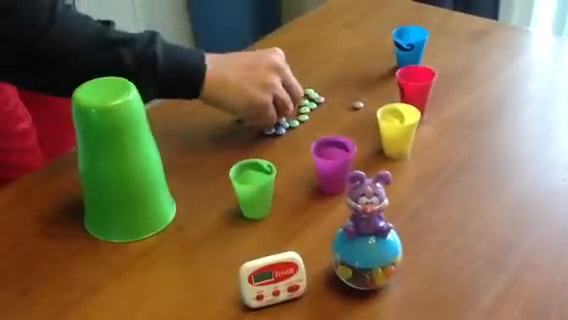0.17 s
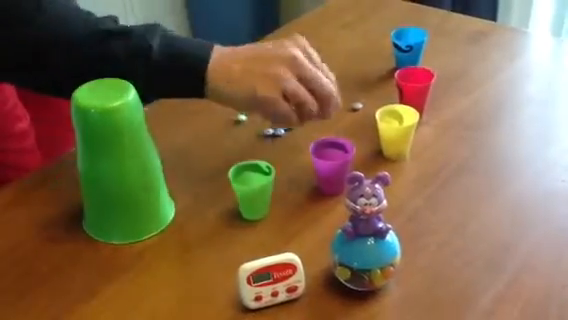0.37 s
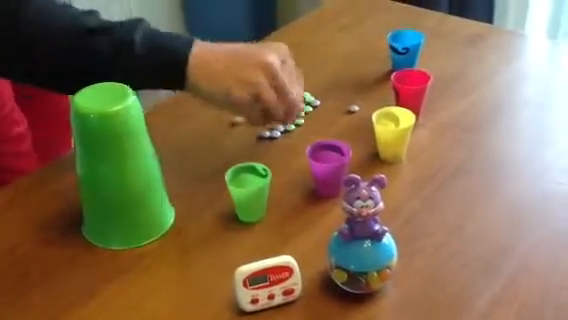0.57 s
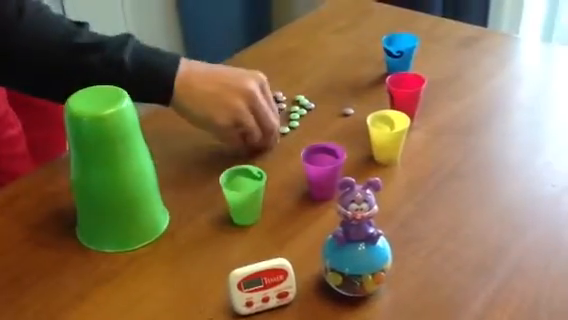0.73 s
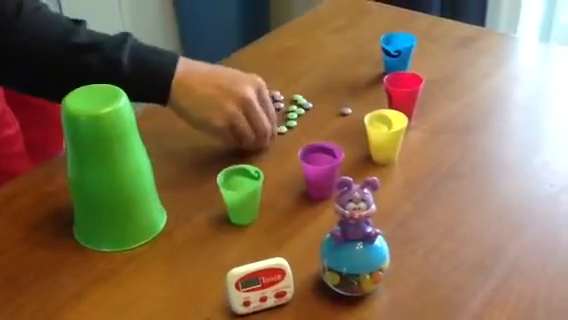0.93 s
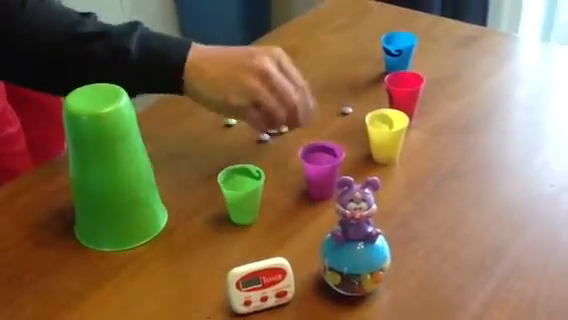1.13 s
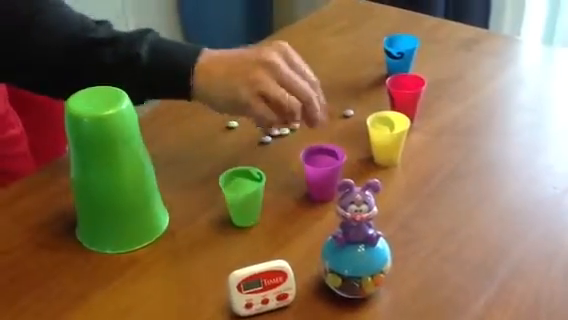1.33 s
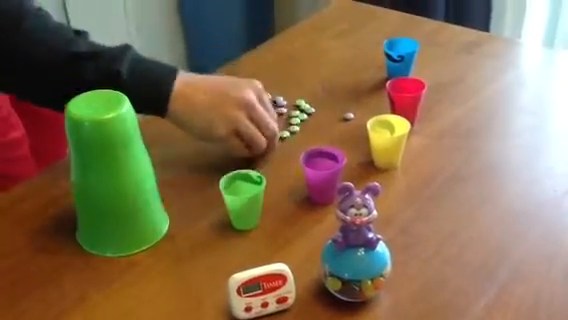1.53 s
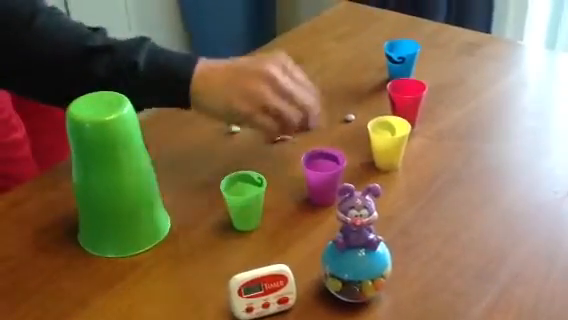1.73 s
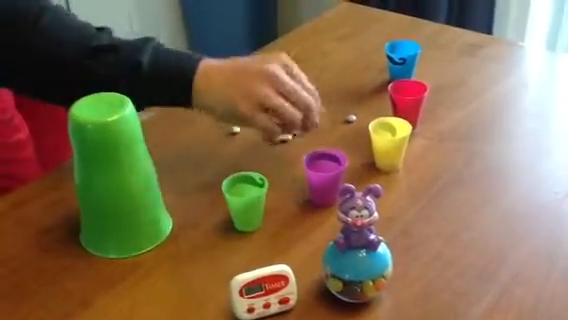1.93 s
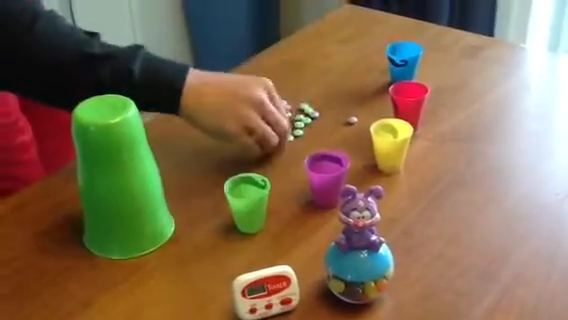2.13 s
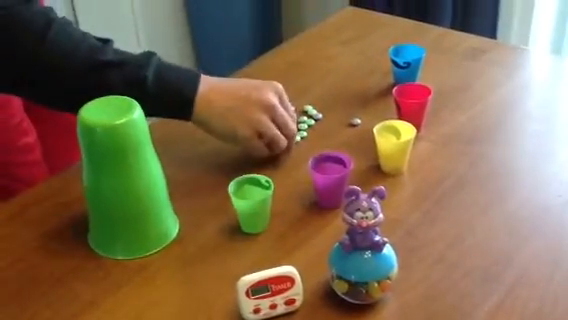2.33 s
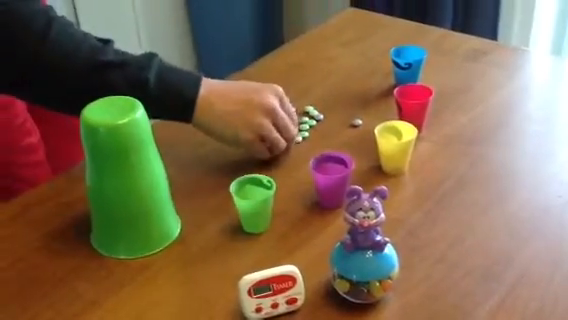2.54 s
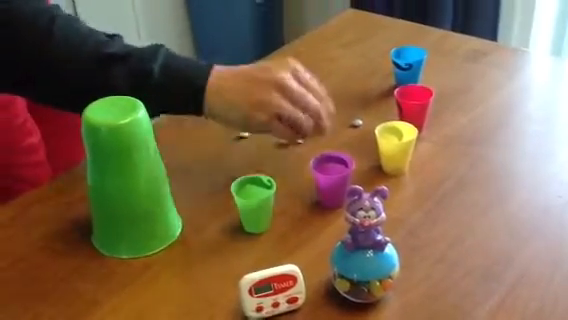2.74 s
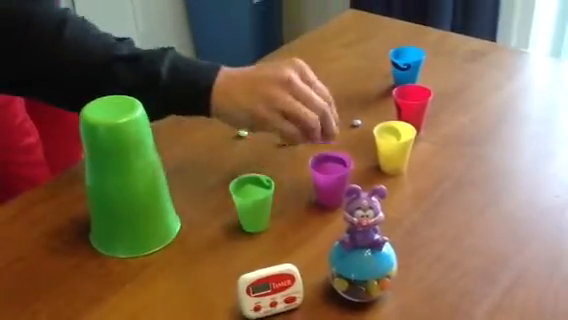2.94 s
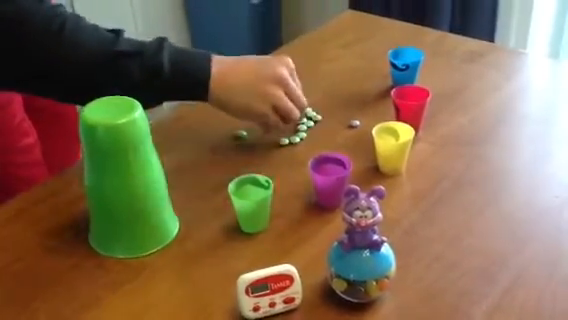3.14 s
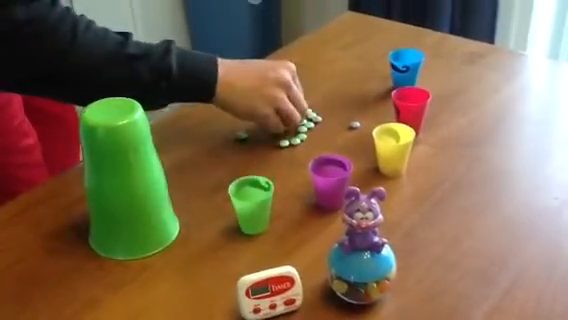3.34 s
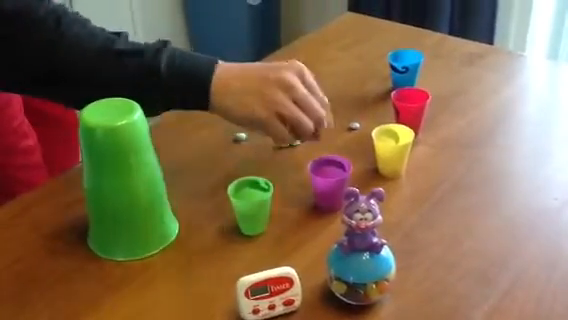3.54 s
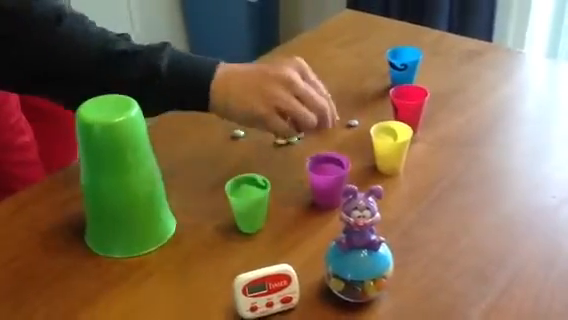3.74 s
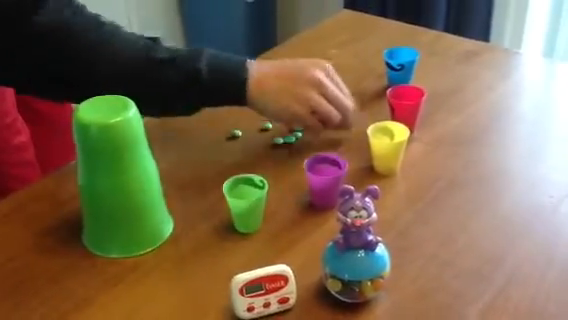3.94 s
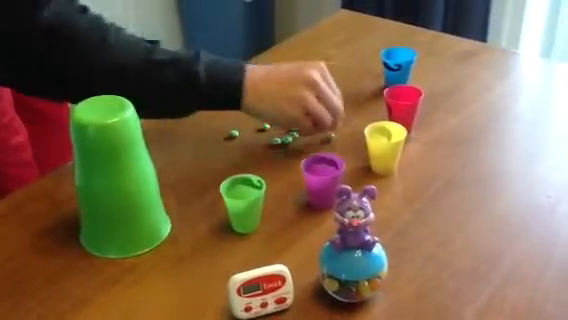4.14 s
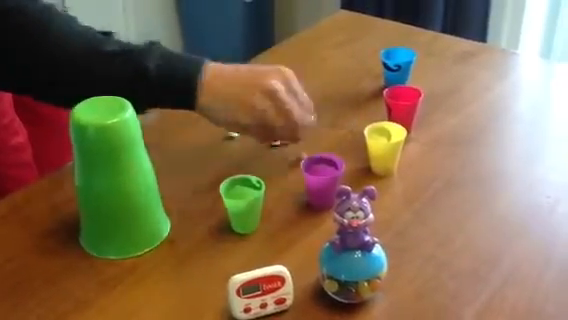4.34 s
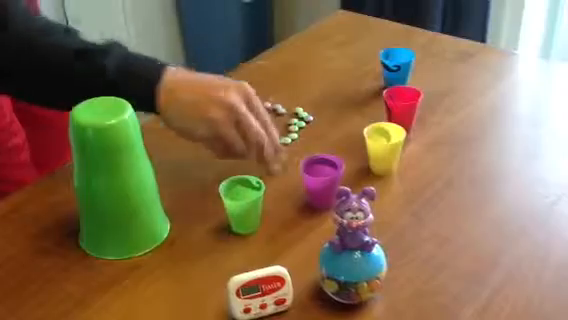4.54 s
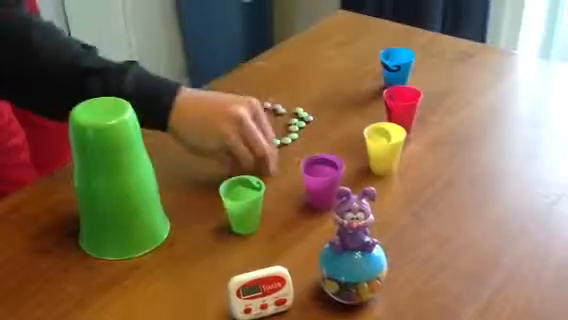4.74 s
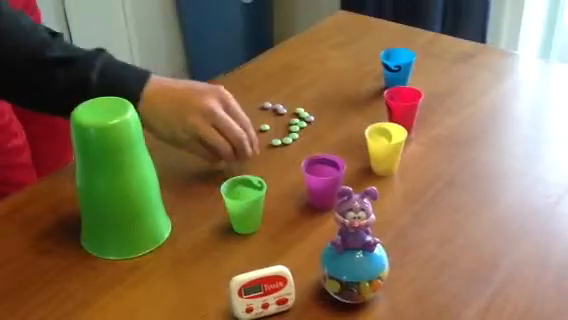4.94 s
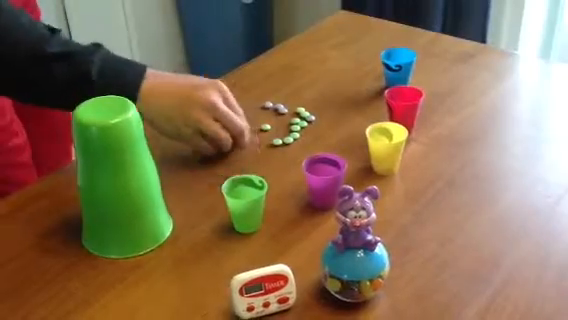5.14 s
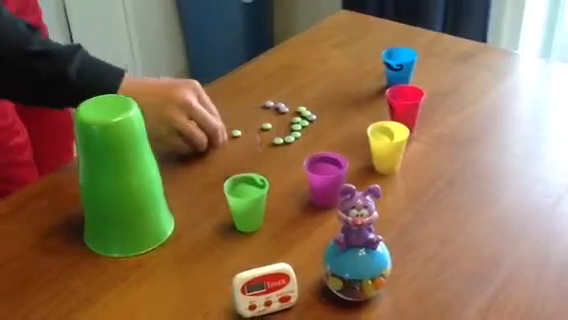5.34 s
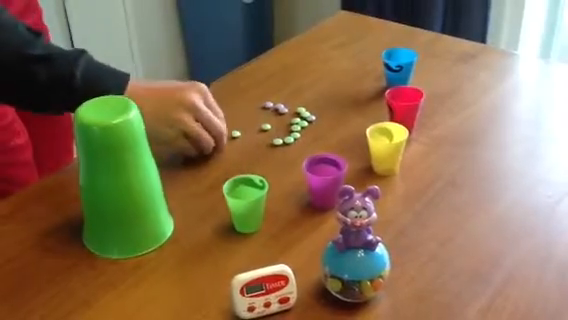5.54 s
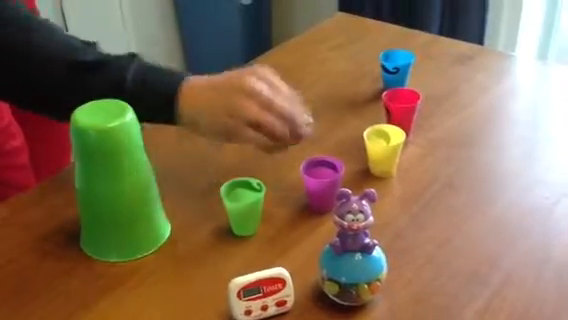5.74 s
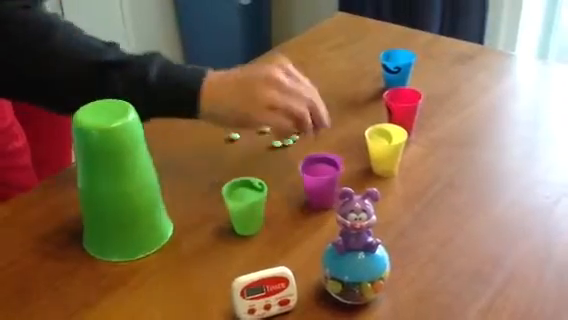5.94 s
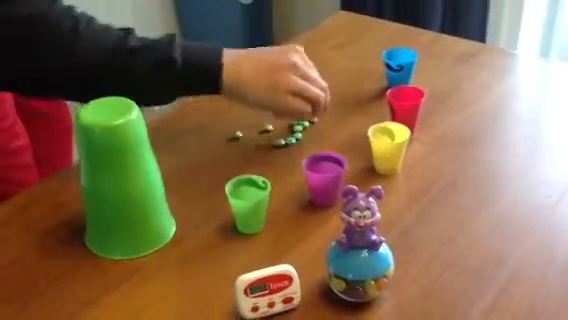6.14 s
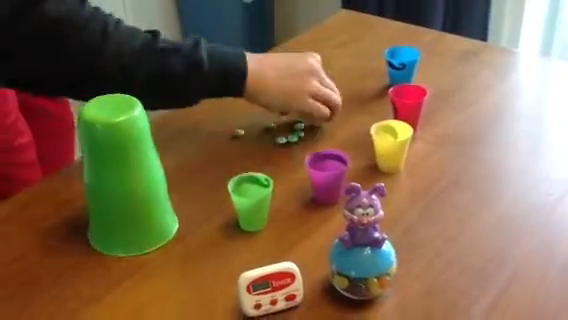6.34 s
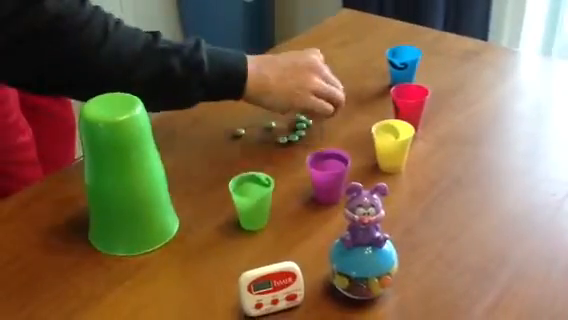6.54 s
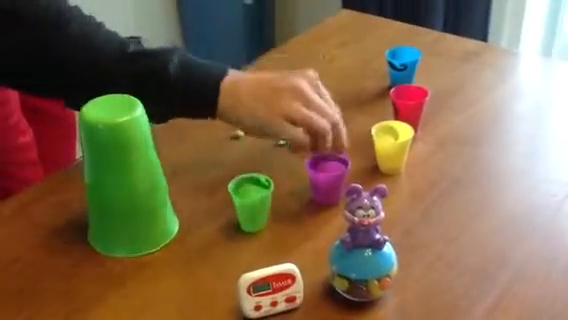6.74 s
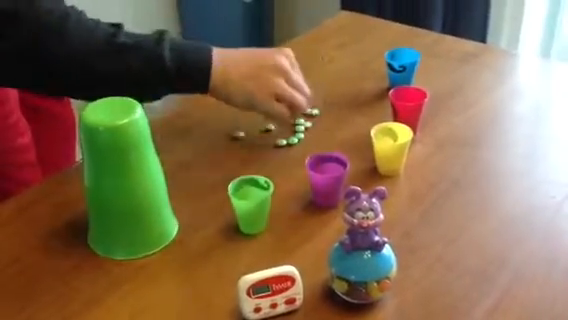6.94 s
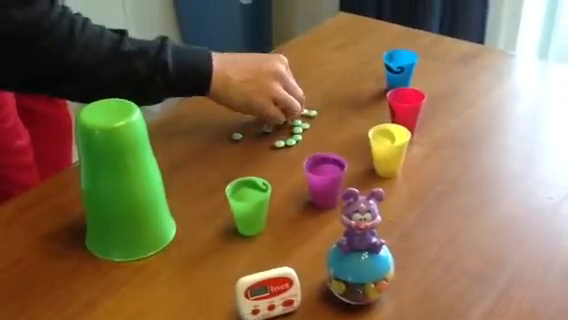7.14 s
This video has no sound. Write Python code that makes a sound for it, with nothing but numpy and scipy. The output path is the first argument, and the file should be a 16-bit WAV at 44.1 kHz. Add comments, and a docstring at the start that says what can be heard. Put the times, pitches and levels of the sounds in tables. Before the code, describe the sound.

Close, handheld pickup in a quiet room: small hard candies fall into thin plastic cups, each drop a sharp bright clack followed by quick bounces and a tiny rattle. Several drops come about a second apart, then candies tick and scrape lightly on a wooden table, then two more cup drops. Soft hiss and small dull handling bumps lie beneath.

```python
"""Small hard candies drop into thin plastic cups on a wooden table: struck wall modes, noisy cracks and rattles.
Loose candies tick and skid on the wood, made of chattering coloured noise over a ringing knock of the table.
The hand-held recorder adds soft bumps (filtered pushes) and finger rubs (swells of low narrow noise).
A quiet room adds an early echo and a noise tail; coloured hiss with a flickering low part lies below."""
import sys
import numpy as np
from scipy import signal
from scipy.fft import rfft, irfft
from scipy.io import wavfile
from scipy.ndimage import uniform_filter1d

SR = 44100
rng = np.random.default_rng(int(sys.argv[2]) if len(sys.argv) > 2 else 0)


def log_audio(samples):
    """Write samples as a 16-bit WAV file to the path given in sys.argv[1]."""
    # one column per channel
    frames = np.atleast_2d(samples).T
    # limit to full scale, then quantise
    limited = np.clip(frames, -1, 1)
    pcm = np.round(limited * 32767).astype(np.int16)
    wavfile.write(sys.argv[1], SR, pcm)


N = 321930

# Colour of the hiss. Each row: frequency in Hz, relative density in dB per Hz.
HISS_COLOUR = [(25, -44.5), (70, -26), (110, -3.5), (213, -1), (400, -7.5), (850, -15.5), (2450, -21),
               (5000, -22), (6500, -17.5), (8000, -21.5), (16300, -24.5)]
HISS_RMS_DB = -61

# Candy on wood. Each row: start in seconds, level in dB before the table's trim,
# rise in seconds (short for a tick, long for a skid).
TABLE_TICKS = [(0.0862, -37, 0.0016), (1.8298, -39, 0.00082), (4.247, -32.5, .006), (4.3063, -26, 0.00028),
               (4.318, -33.5, 0.0033), (4.366, -30, 0.0051), (4.43, -27.5, 0.00028), (4.485, -35.5, .001),
               (4.4905, -32.5, .003), (4.702, -33.5, 0.0054), (4.7402, -24, 0.000089),
               (4.7836, -21.5, 0.000081), (4.847, -25.5, 0.00095), (4.911, -34.5, 0.0032),
               (4.9803, -40, 0.0027), (5.0524, -39.5, 0.00067), (5.18, -39, .001), (5.959, -23, .003)]
# Colour of the chatter on the table top. Each row: frequency in Hz, relative density in dB per Hz.
WOOD_COLOUR = [(500, -38.5), (900, -16.5), (1400, -15), (2200, -19), (4000, -15.5), (6500, 0), (8300, -11),
               (10200, -8.5), (12000, -30), (15000, -29)]
# The table top's answer to each contact: frequency in Hz, level in dB relative to the tick, t60 in seconds.
TABLE_KNOCK = (1390, -23.5, .03)

# Decay of the room. Each row: frequency in Hz, t60 in seconds.
ROOM_T60 = [(900, 0.72), (1700, 0.68), (3500, 0.44), (6500, 0.42), (10000, 0.28), (15000, 0.2)]
# Echo off the near wall. Each row: delay in seconds, level in dB relative to the direct sound.
WALL_ECHOES = [(.0085, -14.5)]

# Bumps on the recorder's body. Each row: time in seconds, peak in dB, direction as a sign,
# width of the push in seconds.
BUMPS = [(0.129, -29.5, 1, 0.00057), (0.515, -29, 1, 0.00081), (1.1425, -45.5, -1, 0.0019),
         (1.209, -28.5, 1, 0.00054), (1.883, -38.5, -1, 0.00083), (2.0352, -20.5, 1, 0.00059),
         (2.297, -45.5, 1, 0.0029), (3.6622, -36.5, 1, 0.0007), (3.763, -42, -1, 0.00077),
         (4.048, -25, 1, 0.00066), (4.3237, -23, -1, 0.00055), (5.286, -43.5, 1, 0.001)]
LOW_CUT_HZ = 140.5
SNAPLESS_S = 0.0012   # pushes this slow have lost most of their snap

# Fingers shifting on the recorder. Each row: middle in seconds, half length in seconds,
# centre frequency in Hz, level in dB.
FINGER_RUBS = [(0.505, 0.0079, 267, -51), (0.56, 0.011, 146, -54.5), (3.706, 0.034, 255, -52.5),
               (5.938, 0.046, 164, -53.5), (6.865, 0.023, 402, -53)]

# Candy on cup. Each row: start in seconds, level in dB, height of the contact from 0 = floor to 1 = rim,
# lift of the bright part in dB.
CUP_HITS = [(0.6137, -3, 0.53, -2), (0.7319, -9, 0.84, -0.9), (0.8446, -8.5, 0.56, 2.8),
            (0.9156, -14, 0.72, -1.5), (0.9352, -13, 0.094, 3.4), (0.9733, -14, 0.54, 3.5),
            (1.4445, -6.5, 0.52, -5.5), (1.4558, -7, 0.53, -7.5), (1.542, -8.5, 0.61, 5),
            (1.6208, -9.5, 0.48, 4), (1.6417, -20.5, 0.85, -8), (1.6795, -19, 0.47, 3.5),
            (2.014, -6.5, 0.62, -7.5), (2.018, -15.5, 0.85, -2.8), (2.1189, -13, 0.57, -2.5),
            (2.1598, -13.5, 0.64, 4.5), (2.198, -15, 0, 5), (2.209, -18.5, 0, 5), (2.2207, -16, 0, 11.5),
            (2.249, -20.5, 0, 8), (3.0544, -14, 0.82, -1), (3.0589, -6.5, 0.55, -2.5),
            (3.1193, -10.5, 0.65, -2), (3.1347, -15.5, 0.45, -2), (3.1662, -19.5, 0.8, -1.5),
            (3.1775, -15.5, 0.13, 3), (3.203, -12, 0.0054, 4.5), (3.2267, -21.5, 0.15, 4),
            (3.8204, -20, 0.21, -3), (3.828, -9, 0.23, 0), (3.831, -17, 0.78, -2.5), (6.017, -6, 0, 2),
            (6.0219, -5.5, 0.0, 8), (6.0433, -16, 0.63, 1.5), (6.046, -15, 0.4, 6),
            (6.063, -16.5, 0.55, -2), (6.067, -19.5, 0.38, 9.5), (6.0796, -15.5, 0.39, 3),
            (6.0863, -18.5, 0.31, -1), (6.0951, -11, 0.58, -8), (6.115, -11, 0.01, -1),
            (6.1603, -17.5, 0.32, 0), (6.217, -22, 0.43, -5), (6.9087, -16.5, 0.13, 3),
            (6.9116, -7.5, 0.4, 0), (6.9177, -12, 0.3, -2.5), (6.9317, -15, 0.36, -2),
            (6.981, -19, 0.36, 5.5), (6.999, -22, 0.24, 2)]
# Modes of the cup. Each row: frequency in Hz, level in dB, t60 in seconds.
CUP_MODES = [(966, -16, 0.041), (1326, -13.5, 0.059), (1682, -1, 0.026), (3080, -32.5, .03),
             (3523, -1, 0.0053), (4550, -35.5, 0.1), (5707, -28, 0.028), (6564, -8, 0.0074),
             (6865, -12, 0.019), (8000, -16.5, 0.008), (9130, -12, 0.015), (9600, 0, 0.016),
             (10100, -2, 0.018), (14240, -12.5, 0.012)]
# Character of each drop. Each row: start in seconds, rattle in dB relative to the hit, crack trim in dB,
# then the level of each of the three favoured modes in dB relative to the contact.
DROPS = [(0, -24.5, 4, -13, -8, 8.5), (1.3, -18.5, 2.5, -25, -2, 4.5), (1.9, -38, 3.5, -34.5, -3, -11),
         (2.9, -33, -4.5, -7.5, 1, 2.5), (3.7, -8, -3, -2, 5.5, -21.5), (5.8, -10, -1, 3, -0.5, 2.5),
         (6.8, -19.5, 4.5, -15, 6.5, -7)]
# Modes whose level follows the drop: row numbers of CUP_MODES.
FAVOURED_MODES = [3, 5, 6]
# Edges in Hz of the cup's hollow, wall, middle, bright and top part.
PART_EDGES_HZ = [850, 2700, 5200, 8300, 11000, 16000]
# Level in dB of those five parts for a contact on the floor, then at the rim.
ON_FLOOR_DB = [-33.5, -40, -1, -20.5, -6]
AT_RIM_DB = [-21.5, -5.5, -2.5, -1, -0.5]
# Crack in each of the five parts, in dB relative to the part.
CRACK_DB = [-1.5, 7.5, -1.5, 0, 1.5]
# Glancing contacts that set just one ring of the wall going. Keyed by row of CUP_MODES;
# each row: time in seconds, level in dB.
GLANCES = {3: [(6.0225, -36.5), (6.0436, -30.5)], 4: [(0.7325, -23.5)], 5: [(1.648, -50), (2.0745, -43),
           (2.1925, -46.5), (3.0595, -39), (3.842, -47), (3.9295, -64), (3.948, -52.5)], 6: [(0.614, -18.5),
           (0.8452, -24.5), (1.5435, -29.5), (1.568, -31), (2.161, -26.5), (3.1205, -26), (6.0225, -28)]}
# Dull gaps between the cup's rings. Each row: low edge in Hz, high edge in Hz, share of the band subtracted.
CUP_DIPS = [(1862, 3130, 0.25), (4930, 5370, 0.48)]
# The thin wall flexes: pitch steps up or down by a share of the frequency plus a fixed amount.
DETUNE_SHARE, DETUNE_HZ = 0.017, 48.6
DULL_DB_PER_DB = 0.74   # gentler hits lose more of the top part

TOP_HZ, CUTOFF_HZ = 15500, 16400   # where the treble rolls off, and where it is cut


def from_db(db):
    """Turns dB into gain."""
    return 10 ** (np.asarray(db) / 20)


def at_hz(points, hz):
    """Reads a two-column table on a log-frequency axis."""
    table_hz, values = np.transpose(points)
    return np.interp(np.log(hz), np.log(table_hz), values)


def coloured(x, spectrum):
    """Shapes the spectrum of x by a table of dB over frequency."""
    hz = np.maximum(np.arange(N // 2 + 1) * SR / N, 1)
    return irfft(rfft(x) * from_db(at_hz(spectrum, hz)), N)


def band(x, low_hz, high_hz):
    """Passes one frequency band."""
    return signal.sosfilt(signal.butter(2, [low_hz, high_hz], "band", fs=SR, output="sos"), x)


def clicks(times, gains):
    """Places a one-sample click per contact."""
    out = np.full(N, 1e-18)   # an inaudible floor under the resonators
    np.add.at(out, (np.asarray(times) * SR).astype(int), gains)
    return out


def ring(x, hz, t60):
    """Resonates: a unit click sets off a dying sine that starts from height 1."""
    radius = 1000 ** (-1 / (t60 * SR))
    w = 2 * np.pi * hz / SR
    return signal.lfilter([0, np.sin(w)], [1, -2 * radius * np.cos(w), radius ** 2], x)


def hiss(rumble_flicker_db):
    """Room tone and microphone noise; the low part flickers with small movements of the hand."""
    tone = coloured(rng.standard_normal(N), HISS_COLOUR)
    low = signal.sosfilt(signal.butter(2, 500, fs=SR, output="sos"), tone)
    slow = uniform_filter1d(uniform_filter1d(rng.standard_normal(N), size=900), size=900)
    flicker = from_db(rumble_flicker_db * slow / slow.std())
    tone = tone + low * (flicker - 1)
    return from_db(HISS_RMS_DB) * tone / tone.std()


def table(level_db, fade_s, skid, chatter_per_s, click_s, smooth):
    """Loose candies chatter on wood in short noisy clicks; ticks open with a click, skids swell in."""
    t = np.arange(SR // 10) / SR
    envelope = np.zeros(N)
    times, levels_db, rises_s = np.transpose(TABLE_TICKS)
    for s, db, rise_s in TABLE_TICKS:
        at = int(s * SR)
        swell = 1 - np.exp(-t / rise_s)
        fade = np.exp(-t / (fade_s + skid * rise_s))   # slow skids also last longer
        envelope[at:at + len(t)] += from_db(db + level_db) * swell * fade

    opening = clicks(times, np.exp(-rises_s / click_s))
    random_touches = (rng.random(N) < chatter_per_s / SR) * rng.random(N)
    click_fade = np.exp(-1 / (click_s * SR))
    chatter = smooth + signal.lfilter([1], [1, -click_fade], opening + random_touches)
    scrape = coloured(envelope * chatter * rng.standard_normal(N), WOOD_COLOUR)

    hz, knock_db, t60 = TABLE_KNOCK
    knocks = ring(clicks(times + rises_s, from_db(levels_db + knock_db)), hz, t60)
    return scrape + knocks


def room(x, tail_db):
    """Adds the near wall's echo and a dense tail: bands of noise, each dying at its own rate."""
    t = np.arange(SR // 2) / SR
    white = rng.standard_normal((2, len(t)))
    edges = np.append(700 * 2 ** np.arange(0, 5, 0.5), 19000)   # half octaves, the last one narrower
    tail = 0
    for k, (low, high) in enumerate(zip(edges, edges[1:])):
        t60 = at_hz(ROOM_T60, np.sqrt(low * high))
        tail = tail + band(white[k % 2], low, high) * 1000 ** (-t / t60)
    response = from_db(tail_db) * tail * (1 - np.exp(-t / 0.00035))
    response[0] = 1   # direct sound
    for s, db in WALL_ECHOES:
        response[int(s * SR)] += from_db(db)
    return signal.fftconvolve(x, response)[:N]


def bumps(snap_db, snap_s):
    """A soft push with a small snap; the microphone's steep low cut draws it out into a falling wobble."""
    out = np.zeros(N)
    t = np.arange(-SR // 100, SR // 10) / SR
    low_cut = signal.butter(6, LOW_CUT_HZ, "high", fs=SR, output="sos")
    snap = from_db(snap_db) * np.exp(-0.5 * (t / snap_s) ** 2)
    for s, db, direction, width_s in BUMPS:
        push = np.exp(-0.5 * (t / width_s) ** 2)
        snap_share = np.exp(-2 * (width_s / SNAPLESS_S) ** 2)
        wobble = signal.sosfilt(low_cut, push + snap_share * snap)
        at = int((s + t[0]) * SR)
        # the push itself goes against the listed direction
        out[at:at + len(t)] -= np.sign(direction) * from_db(db) * wobble / np.abs(wobble).max()
    return out


def rubs(spread):
    """Fingers shift on the recorder: short swells of low narrow noise."""
    t = np.arange(N) / SR
    white, out = rng.standard_normal(N), np.zeros(N)
    for s, half_s, hz, db in FINGER_RUBS:
        noise = band(white, hz / spread, hz * spread)
        swell = np.exp(-((t - s) / half_s) ** 2)
        out += from_db(db) * swell * noise / noise.std()
    return out


def cup_contacts(spread_db, rattle_per_s, rattle_s):
    """Each hit is followed by six small knocks at random gaps, fading as the candies settle."""
    hits, drops = np.array(CUP_HITS), np.array(DROPS)
    drop = drops[np.searchsorted(drops[:, 0], hits[:, 0]) - 1]   # the drop each hit belongs to
    late = np.cumsum(rng.exponential(1 / rattle_per_s, (len(hits), 6)), axis=1)
    fade_db = 20 * np.log10(np.e) * late / rattle_s
    knock_db = drop[:, 1:2] - fade_db + spread_db * rng.standard_normal(late.shape)
    # the hit itself goes ahead of its six knocks
    times = (hits[:, :1] + np.insert(late, 0, 0, axis=1)).ravel()
    level_db = (hits[:, 1:2] + np.insert(knock_db, 0, 0, axis=1)).ravel()
    return times, level_db, np.repeat(hits, 7, axis=0), np.repeat(drop, 7, axis=0)


def cup_modes(times, level_db, parts_db, drop, spread_db, contact_s):
    """Each contact strikes every wall mode with its own strength, sign, delay and slight detuning."""
    mode_part = np.searchsorted(PART_EDGES_HZ, np.array(CUP_MODES)[:, 0]) - 1
    mode_db = parts_db[:, mode_part]
    mode_db[:, FAVOURED_MODES] = level_db[:, None] + drop[:, 3:]
    chance = rng.standard_normal((len(times), len(CUP_MODES), 2))
    gains = from_db(mode_db + spread_db * chance[..., 0]) * np.sign(chance[..., 1])
    lag = contact_s * rng.random(gains.shape)   # the candy skips along, so modes start apart
    pitch = np.floor(3 * rng.random(gains.shape)) - 1   # -1 low, 0 true, 1 high
    out = 0
    for k, (hz, db, t60) in enumerate(CUP_MODES):
        # all but the first of the favoured modes hold their pitch
        detune_hz = 0 if k in FAVOURED_MODES[1:] else DETUNE_SHARE * hz + DETUNE_HZ
        for step in (-1, 0, 1):
            strikes = clicks(times + lag[:, k], gains[:, k] * (pitch[:, k] == step))
            out = out + from_db(db) * ring(strikes, hz + step * detune_hz, t60)
    return out


def cup_glances():
    """A glancing contact rings a single mode at its true pitch."""
    out = 0
    for k, rows in GLANCES.items():
        times, levels_db = np.transpose(rows)
        hz, _, t60 = CUP_MODES[k]
        out = out + ring(clicks(times, from_db(levels_db)), hz, t60)
    return out


def cup_cracks(times, parts_db, drop, crack_s):
    """Each contact cracks: a brief noise burst in every part, swelling and dying within milliseconds."""
    white = rng.standard_normal((2, N))
    fade = np.exp(-1 / (crack_s * SR))
    out = 0
    for k, (low, high) in enumerate(zip(PART_EDGES_HZ, PART_EDGES_HZ[1:])):
        strikes = clicks(times, from_db(parts_db[:, k] + CRACK_DB[k] + drop[:, 2]))
        burst = signal.lfilter([1 - fade], [1, -2 * fade, fade ** 2], strikes)
        out = out + band(white[k % 2] * burst, low, high)
    return out


def cups(spread_db, crack_s, rattle_per_s, rattle_s, contact_s):
    """Hits and rattles ring and crack the cups; contact height balances the five parts of the sound."""
    times, level_db, hit, drop = cup_contacts(spread_db, rattle_per_s, rattle_s)
    height = hit[:, 2:3]
    parts_db = level_db[:, None] + (1 - height) * ON_FLOOR_DB + height * AT_RIM_DB
    parts_db[:, 3] += hit[:, 3]
    parts_db[:, 4] += DULL_DB_PER_DB * level_db
    out = cup_modes(times, level_db, parts_db, drop, spread_db, contact_s) + cup_glances()
    out = out + cup_cracks(times, parts_db, drop, crack_s)
    for low, high, share in CUP_DIPS:
        out = out - share * band(out, low, high)
    # a small thin cup radiates no bass
    return signal.sosfilt(signal.butter(4, PART_EDGES_HZ[0], "high", fs=SR, output="sos"), out)


def scene():
    """Mixes cups and table in the room, then handling and hiss, at one microphone."""
    in_cups = cups(spread_db=2.0, contact_s=0.0012, crack_s=0.00074, rattle_per_s=130, rattle_s=0.054)
    on_wood = table(level_db=6.0, fade_s=0.0077, skid=1.27, chatter_per_s=357, click_s=0.00074, smooth=0.26)
    hand = bumps(snap_db=-8, snap_s=0.00027) + rubs(spread=1.25)
    in_room = room(in_cups + on_wood, tail_db=-35.0)
    return (in_room + hand + hiss(rumble_flicker_db=-2.0))[None]


def record(dry):
    """Rolls off the extreme treble, then cuts it steeply."""
    dull = signal.sosfilt(signal.butter(12, TOP_HZ, fs=SR, output="sos"), dry)
    return signal.sosfilt(signal.cheby2(12, 70, CUTOFF_HZ, fs=SR, output="sos"), dull)


dry = scene()
out = record(dry)
log_audio(out)
```